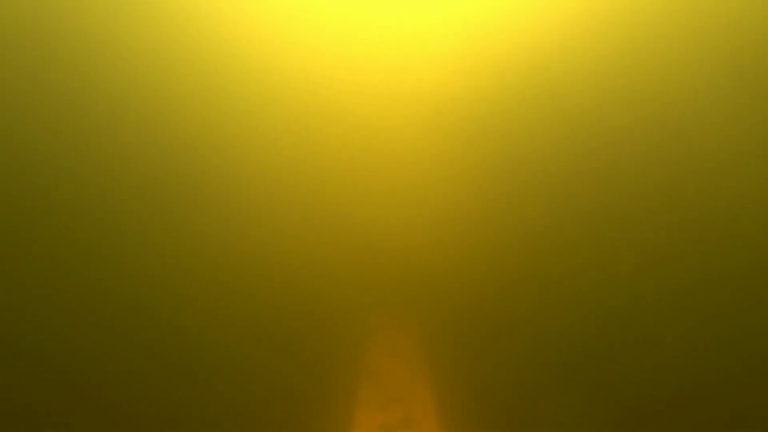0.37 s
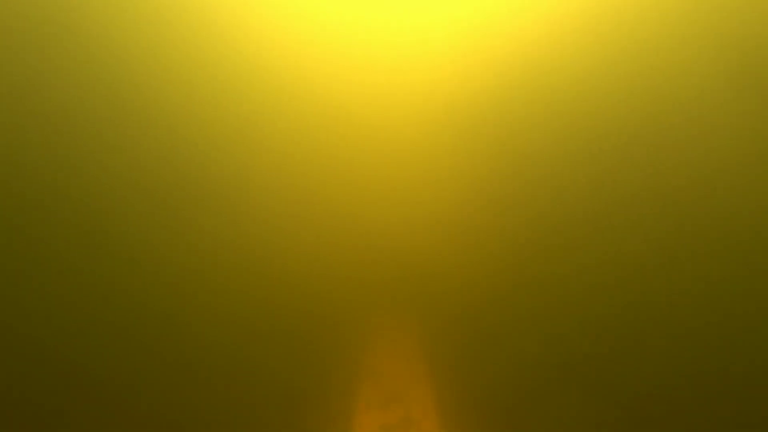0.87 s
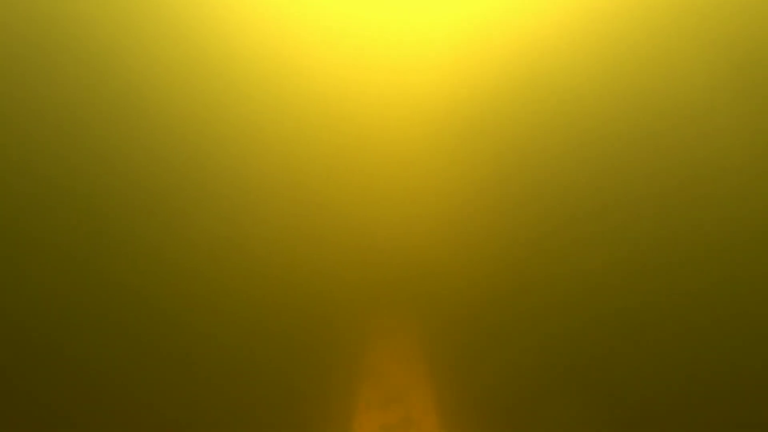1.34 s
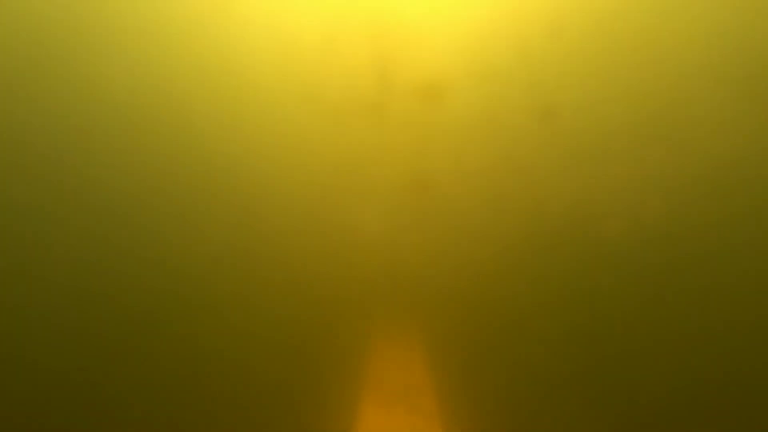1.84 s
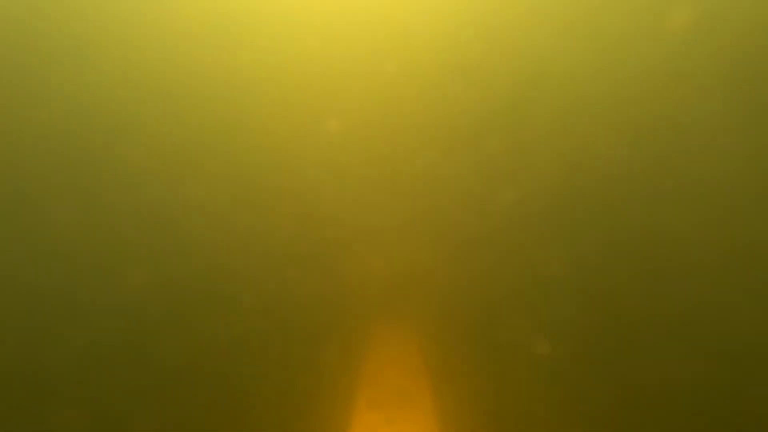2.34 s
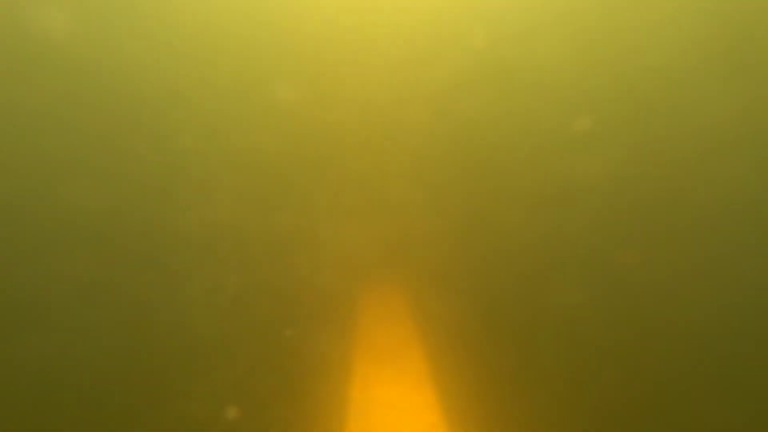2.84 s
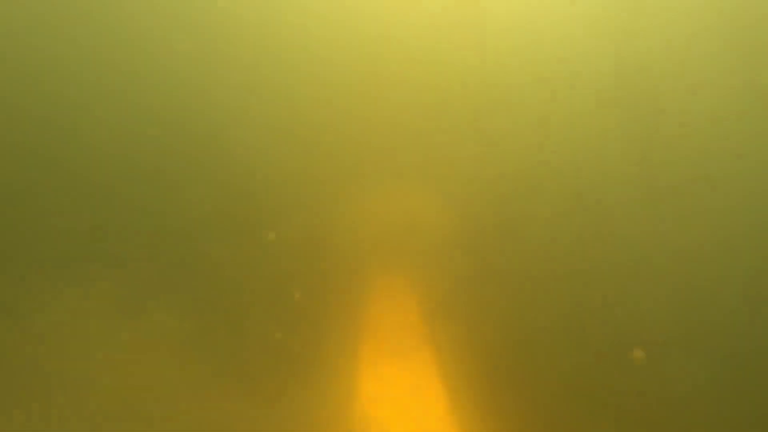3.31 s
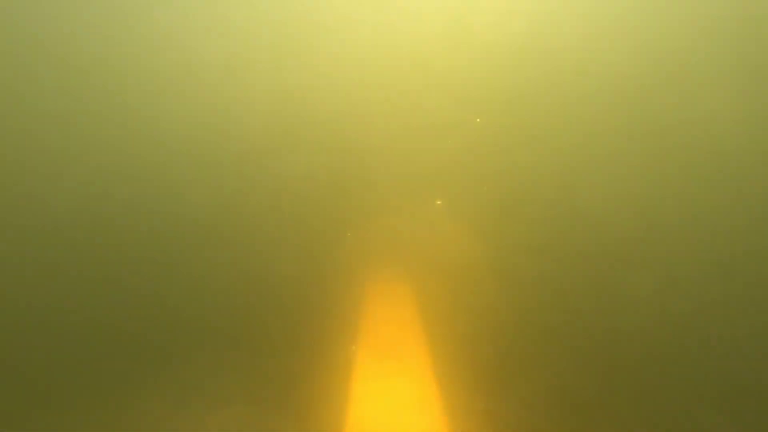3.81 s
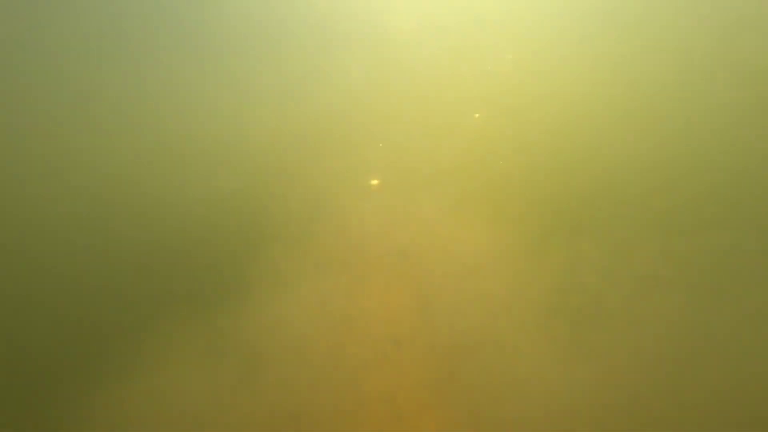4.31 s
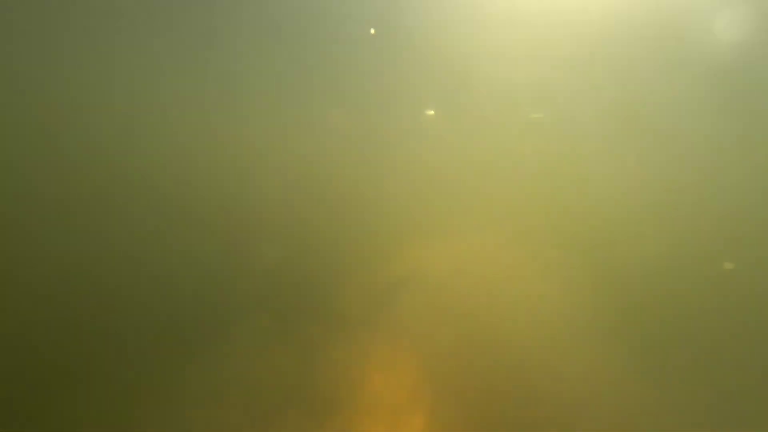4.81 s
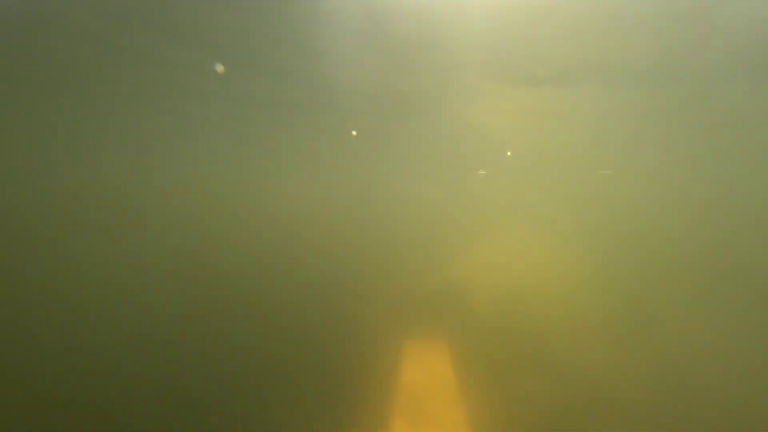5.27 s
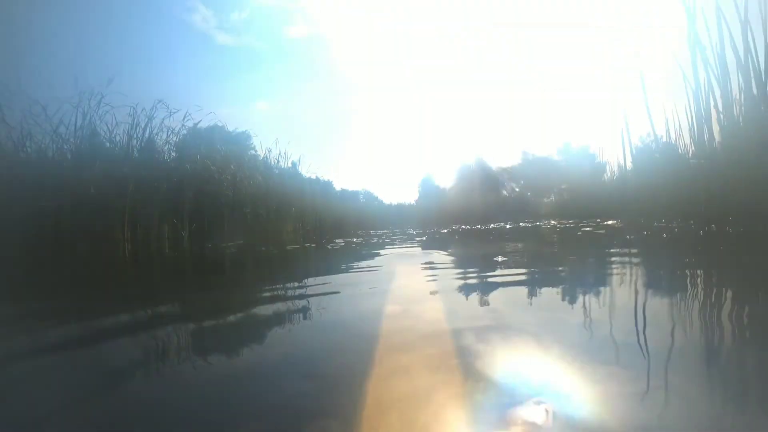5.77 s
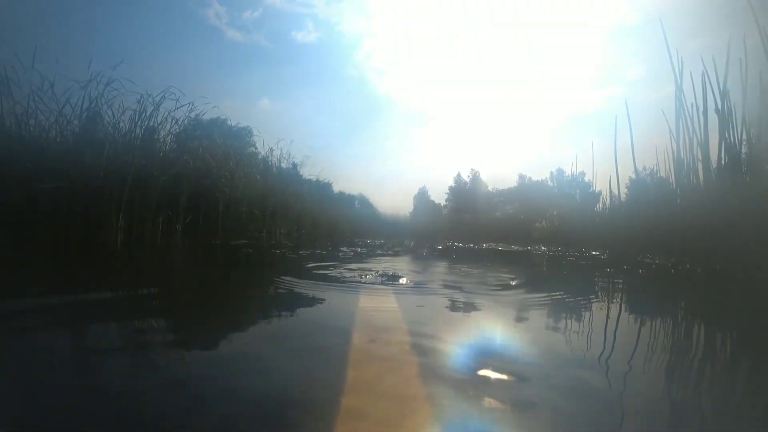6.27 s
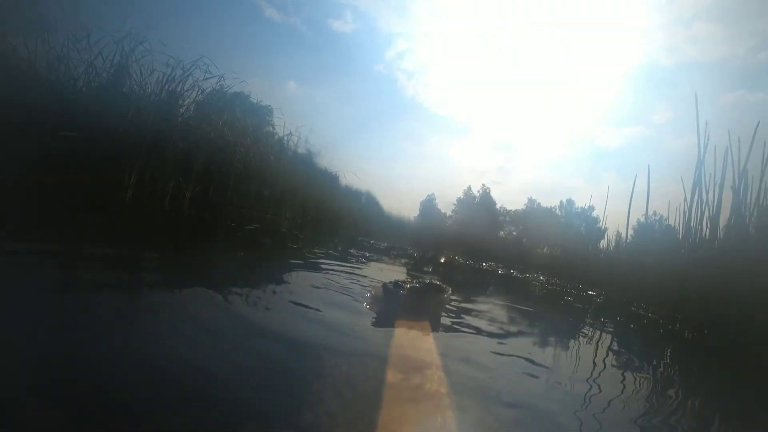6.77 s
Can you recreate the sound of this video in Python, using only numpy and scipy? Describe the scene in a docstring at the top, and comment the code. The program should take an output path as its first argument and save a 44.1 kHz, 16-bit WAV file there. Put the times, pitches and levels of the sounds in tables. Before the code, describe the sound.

Muffled near-silence under pond water, a run of bubbling tones, scrapes and low thuds, then loud clunks and rumbling slosh on surfacing.

```python
"""Housed camera drawn up through a pond

Heard from inside a sealed housing on a pole, which comes up through the water and breaks the surface.
Air escapes in a quickening string of bubble tones; jolts and noisy contacts ring pole and shell modes.
Slipping noise makes the drag and rubbing, low filtered noise the slosh of water against the housing.
The two capsules feel the shell's shaking mostly in opposite phase and slow pressure in phase."""
import sys
import numpy as np
from scipy import signal
from scipy.fft import rfft, irfft, next_fast_len
from scipy.io import wavfile
from scipy.ndimage import uniform_filter1d

SR = 44100
rng = np.random.default_rng(int(sys.argv[2]) if len(sys.argv) > 2 else 0)


def boost(x):
    """Linear amplitude factor 10**(x/20) for a level x in decibels (scalar or array-like)."""
    u = np.asarray(x, float) / 20
    return 10 ** u


def pcm_store(signal):
    """Save signal as 16-bit PCM."""
    levels = np.round(np.clip(np.atleast_2d(signal), -1, 1) * 32767)
    wavfile.write(sys.argv[1], SR, levels.astype(np.int16).T)


N = 314521
TIME = np.arange(N) / SR
SURFACE_S = 5.6  # the rig leaves the water

# Heavy jolts of the pole. Each row: start in seconds, shake level in dB, pressure level in dB,
# push length in seconds; levels are relative, ahead of the pole modes.
JOLTS = [(3.206, -52, -40, .0053), (3.253, -19, -17, .0039), (3.327, -35, -23, 0.0027),
         (3.344, -19, -35.5, 0.0047), (3.473, -34, -52, 0.0024), (4.138, -56, -41, 0.0042),
         (4.21, -44, -37, 0.004), (4.241, -33, -35, 0.0044), (5.073, -46, -55, 0.005),
         (5.244, -47, -41.5, 0.0031), (5.272, -46, -38, 0.0023), (5.31, -41, -39.5, 0.0026),
         (5.343, -45, -42.5, 0.0038), (5.662, -23, -19.5, 0.0038), (5.683, -27, -21.5, 0.0023),
         (5.694, -17, -22.5, .0042), (5.77, -21.5, -38, 0.0046), (5.879, -28, -22, .0025),
         (5.903, -27, -28, 0.0036), (6.084, -49, -46.5, 0.0033), (6.426, -27, -29, 0.008),
         (6.455, -22, -32, 0.0063), (6.514, -17.5, -38, .004), (6.528, -21, -34, 0.0072),
         (6.581, -25, -51, .0049), (6.603, -16, -34, 0.0042), (6.625, -16.5, -30, 0.0049),
         (6.888, -40, -59, 0.0021), (6.958, -18.5, -27.5, 0.0087), (7.112, -26, -43, 0.0037)]
# Pole modes, lighter out of the water. Each row: nominal pitch in Hz, free decay t60 in seconds,
# shake in dB under water, shake in dB in air, pressure in dB under water, pressure in dB in air.
POLE_MODES = [(46, 0.29, -26, -22, -6, -3), (87.16, 0.32, -16, -13, 1.5, 1),
              (120.5, 0.13, 0.5, -7, 4.5, 1.5), (147.5, 0.11, -3, -2, -9.5, -7),
              (175, 0.078, -5, -17, -7, -25), (247, 0.13, -3, -2.5, -17, -19),
              (254, 0.49, -7.5, -9, -15.5, -21.5), (302, 0.024, -0.5, -17, -39, -51)]


def colour(x, points, turn=1):
    """Filter by (Hz, dB) points; turn rotates the phase."""
    hz, db = np.transpose(points)
    size = next_fast_len(N)
    f = np.maximum(np.arange(size // 2 + 1) * SR / size, 1)
    gain = boost(np.interp(np.log(f), np.log(hz), db))
    return irfft(rfft(x, size) * turn * gain, size)[..., :N]


def unit(x):
    """Scale to rms 1."""
    return x / np.sqrt(np.mean(x ** 2))


def ring(x, hz, t60):
    """One decaying mode; a unit impulse starts it at amplitude 1."""
    pole = np.exp(2j * np.pi * hz / SR - np.log(1000) / (t60 * SR))
    return signal.lfilter([0, pole.imag], [1, -2 * pole.real, abs(pole) ** 2], x)


def shell(x):
    """The housing rings with all its modes, neighbours in opposite sign."""
    # Each row: mode pitch in Hz, decay t60 in seconds, level in dB.
    shell_modes = [(400, 0.01, -1.5), (560, 0.032, -3), (677, 0.026, -4.5), (861, 0.013, -4.5),
                   (1130, 0.0094, -9), (1374, 0.021, -14.5), (1500, 0.0098, -14), (1905, 0.0037, -13.5),
                   (2190, 0.016, -26.5), (2700, 0.0022, -33.5)]
    return sum((-1) ** k * boost(db) * ring(x, hz, t60) for k, (hz, t60, db) in enumerate(shell_modes))


def walk(rate):
    """Slow random wander with a spread near 1, drawn afresh rate times a second."""
    k = int(SR / rate)
    steps = np.repeat(rng.standard_normal(N // k + 1), k)
    return unit(uniform_filter1d(steps, k)[:N])


def grit(per_s, spread_db):
    """Two rows of random slips that share their moments and part of their size."""
    size = (rng.random(N) < per_s / SR) * boost(spread_db * rng.exponential(size=N))
    return unit(size * rng.standard_normal((2, N)))


def add(out, s, x):
    """Mix x into out from time s."""
    i = int(s * SR)
    out[..., i:i + x.shape[-1]] += x[..., :N - i]


def swell(law, s, db, rise, fall):
    """Gain of a layer: a steady part that follows the motion, plus peaks, summed in power."""
    # How hard the rig moves through the water. Each row: time in seconds, motion in dB.
    motion = [(0, -32.5), (0.55, -11.5), (0.93, -4.5), (1.2, -6.5), (1.6, 0.5), (2.0, -1.5), (2.7, 3.5),
              (3.05, 10.5), (3.5, 8), (3.7, 1.5), (4.0, -4), (4.2, 8), (4.44, -7.5), (4.7, 7), (4.95, -6),
              (5.3, 17), (5.46, 1.5), (5.65, 17), (6.0, 10), (6.24, 1.5), (6.5, 27), (6.85, 13), (7.13, 15)]
    at_rest_db, follow = law  # dB at 0 dB of motion, share of the motion followed
    t = TIME[::64, None]
    steady_db = at_rest_db + follow * np.interp(t[:, 0], *np.transpose(motion))
    peaks = boost(db) * np.exp(np.where(t < s, (t - s) / rise, (s - t) / fall))
    gain = np.sqrt(boost(steady_db) ** 2 + (peaks ** 2).sum(axis=1))
    return np.interp(TIME, t[:, 0], gain)


def bubbles():
    """Tones struck as each bubble pinches off, starting 1 % flat and settling; (shared, opposed)."""
    # Escaping air. Each row: time in seconds, short pop in Hz, pop level in dB, longer ring in Hz,
    # ring level in dB.
    escapes = [(1.831, 963, -31, 627, -27.5), (1.953, 1312, -8, 820, -8), (2.121, 1156, -13.5, 1300, -35.5),
               (2.193, 1046, -18.5, 1430, -29), (2.349, 1000, -18.5, 1265, -22.5),
               (2.405, 980, -20, 1190, -23), (2.454, 940, -21.5, 1127, -23), (2.501, 930, -23.5, 1300, -25),
               (2.547, 865, -30, 1294, -22), (2.59, 910, -31, 1290, -24), (2.622, 834, -35, 1240, -26.5),
               (2.653, 900, -30, 1254, -25.5), (2.686, 1220, -25.5, 1230, -30),
               (2.717, 1550, -21.5, 1200, -26), (2.748, 1550, -22, 1160, -23), (2.78, 1440, -16, 1130, -24),
               (2.811, 1140, -15.5, 1470, -26), (2.838, 1120, -17.5, 1380, -24),
               (2.867, 1130, -19, 1400, -25), (2.924, 1350, -37, 637, -34), (2.956, 1644, -15.5, 1230, -36),
               (2.985, 1500, -15, 1130, -33), (3.019, 1385, -14.5, 1210, -29),
               (3.052, 1370, -17, 1160, -26), (3.084, 1410, -26, 1250, -26.5), (3.119, 1363, -19, 907, -24),
               (3.158, 1345, -18, 1470, -42), (3.195, 1470, -18, 1324, -23), (3.225, 1340, -35, 1550, -26),
               (3.349, 1330, -27, 1000, -45), (3.478, 1113, -30, 880, -33.5),
               (3.62, 1353, -27.5, 1150, -41), (6.962, 676, -32, 532, -27), (6.985, 760, -42, 567, -29.5),
               (7.02, 653, -38, 554, -32.5)]
    # In-phase part of a bubble tone, set by how the shell carries that pitch.
    # Each row: pitch in Hz, level in dB.
    carried = [(600, -11.5), (850, -11.5), (1000, -12), (1150, -18.5), (1270, -10), (1350, -17),
               (1430, -24.5), (1520, -20), (1630, -15), (1800, -8)]
    # Housing-wall tones that every bubble leaves ringing. Each row: nominal pitch in Hz, nominal level
    # in dB over the mean of pop and ring, decay t60 in seconds, in-phase part in dB.
    wall_tones = [(874, -8.5, 0.049, -13), (1056, -11, 0.055, -19), (1470, -9, 0.058, -25),
                  (1718, -17.5, 0.047, -11.5)]
    # Tick of a bubble breaking free. Each row: frequency in Hz, level in dB.
    tick_colour = [(250, -13.5), (600, 6), (1200, 0.5), (2200, -17.5), (3600, -30.5), (6000, -43)]
    out, tick, t = np.zeros((2, N)), np.zeros(N), TIME[:SR // 8]
    bend = t - 0.00027 * (1 - np.exp(-t / 0.025))
    for s, pop_hz, pop_db, ring_hz, ring_db in escapes:
        # near 1 for low-ringing bubbles, which press more in phase and pop longer
        big = 1 / (1 + (ring_hz / 827 / 1.06) ** 12)
        pop_shared, ring_shared = np.interp([pop_hz, ring_hz], *np.transpose(carried)) + 4.5 * big
        pop_t60 = 0.024 * (1 + 0.74 * big)
        tones = [(pop_hz, pop_db, pop_t60, pop_shared), (ring_hz, ring_db, 0.05, ring_shared)]
        for hz, db, t60, shared_db in wall_tones:
            a, b = rng.standard_normal(2)
            wall_db = (pop_db + ring_db) / 2 + db + 3.5 * b
            tones.append((hz * (1 + 0.035 * a), wall_db, t60, shared_db))
        for hz, db, t60, shared_db in tones:
            onset = 1 - np.exp(-(t * hz / 1.57) ** 2)  # big bubbles start rounder
            envelope = onset * np.exp(-np.log(1000) * t / t60)
            phase = 2 * np.pi * hz * bend
            pair = np.array([-boost(shared_db) * np.cos(phase), np.sin(phase)])
            add(out, s - .001, boost(db) * envelope * pair)
            # the tick grows less than the ring
            add(tick, s - .0006, boost(np.array([0.53 * (db + shared_db)])))
    return out + boost(np.array([[-6.], [-3.]])) * colour(tick, tick_colour)


def thumps():
    """A soft push sets the pole swinging, shared out differently each time; (shared, opposed)."""
    out, t = np.zeros((2, N)), TIME[:SR // 2]
    for s, shake_db, pressure_db, length in JOLTS:
        push = np.gradient(-np.exp(-((t - length) / length / 0.35) ** 2))  # out and back
        push = push / np.abs(np.sum(push * np.exp(2j * np.pi * 120 * t)))  # equal strength at 120 Hz
        for hz, t60, shake_wet, shake_air, press_wet, press_air in POLE_MODES:
            wet = s < SURFACE_S
            a, b, d = rng.standard_normal(3)
            press = pressure_db + (press_wet if wet else press_air) + 0.5 * a
            shake = shake_db + (shake_wet if wet else shake_air) + 2.2 * b
            gains = boost(np.array([press, shake]))
            add(out, s, gains[:, None] * ring(push, hz * (1 + 0.012 * d), t60))
    return boost(-2.5) * out


def knocks():
    """A short rattling contact drives the shell modes; its treble comes through as a crack."""
    # Hard contacts on pole and shell. Each row: peak in seconds, drive of the shell in dB,
    # crack in dB ahead of its filter and gain, contact scale in seconds.
    contacts = [(1.374, -60, -49.5, 0.00065), (1.64, -41, -75, 0.0046), (1.706, -29, -50, .0012),
                (1.757, -40, -75, .006), (2.18, -37.5, -73, .01), (2.81, -51, -58.5, .004),
                (3.063, -53, -44.5, 0.0011), (3.09, -31.5, -64, 0.013), (3.215, -30.5, -52.5, 0.011),
                (3.229, -41, -43, 0.0013), (3.258, -36, -54.5, 0.0076), (3.282, -55, -45, .0012),
                (3.325, -24, -43.5, 0.002), (3.335, -25.5, -49, .011), (3.383, -31.5, -64, .003),
                (3.569, -34, -78, 0.016), (3.595, -37.5, -84, 0.0042), (4.082, -37, -54, 0.0053),
                (4.137, -34, -65.5, .003), (4.147, -37, -32, 0.00066), (4.212, -26, -49.5, 0.012),
                (4.238, -26, -57, 0.0025), (4.553, -38, -81, 0.023), (4.686, -55, -56, 0.00075),
                (4.725, -40, -44.5, .0011), (4.792, -45, -48.5, 0.0015), (4.807, -42, -56, 0.0058),
                (4.821, -46, -50.5, .0008), (4.954, -51, -56.5, .002), (5.012, -38, -72, .003),
                (5.077, -41.5, -76, .006), (5.237, -25.5, -61, 0.0029), (5.255, -35, -63, 0.0031),
                (5.275, -26.5, -58, 0.0019), (5.311, -23.5, -48.5, 0.00069), (5.337, -37, -65, .0045),
                (5.356, -32, -70, .0015), (5.625, -42, -67.5, .006), (5.663, -21, -55.5, 0.0062),
                (5.671, -29.5, -33, 0.0022), (5.685, -10, -36.5, 0.0017), (5.697, -19.5, -35.5, 0.0016),
                (5.778, -25, -51.5, .0015), (5.858, -24.5, -51, .0022), (5.884, -13, -35, 0.0032),
                (5.889, -16, -31, 0.00073), (5.91, -17, -39.5, 0.0029), (6.124, -41, -61, .009),
                (6.14, -36, -64, 0.01), (6.164, -45, -60, .0015), (6.277, -37.5, -65.5, .012),
                (6.392, -40, -55.5, 0.01), (6.415, -25, -53, 0.019), (6.438, -21.5, -50, 0.0052),
                (6.447, -36.5, -58.5, 0.039), (6.526, -38, -66, 0.0067), (6.548, -33, -62, .0027),
                (6.593, -35, -62.5, .0018), (6.61, -37, -68.5, 0.011), (6.628, -29, -71, 0.0037),
                (6.652, -33, -62, .0025), (6.751, -72, -43.5, 0.0016), (6.765, -43, -62, .0022),
                (6.958, -43.5, -64, .0014), (6.967, -46, -70, .004), (6.976, -33, -66, .007),
                (6.987, -45, -50.5, 0.0019), (7.009, -43.5, -61.5, 0.0041), (7.123, -30, -68, .004)]
    # Each row: frequency in Hz, level in dB.
    crack_colour = [(1500, -10), (2400, -8), (3300, -13), (4400, -16.5), (5300, -16.5), (6100, -18.5),
                    (6900, -22), (8000, -33.5), (11000, -36.5), (16000, -50)]
    body, crack, t = np.zeros((2, N)), np.zeros((2, N)), TIME[:SR // 25] - .02
    for s, body_db, crack_db, length in contacts:
        noise = rng.standard_normal((2, len(t)))
        # rises over 0.72 and falls over 1.36 of the contact scale
        contact = np.exp(np.where(t < 0, t / 0.72, -t / 1.36) / length)
        push = contact * (noise + 0.87 * uniform_filter1d(noise, size=12))  # treble plus a softer shove
        push = push / np.sqrt((push ** 2).sum(axis=1, keepdims=True))
        add(body, s - .021, boost(body_db) * push)
        add(crack, s - .02, boost(crack_db) * contact * noise)
    return shell(body) + boost(21) * colour(crack, crack_colour)


def stroke_gain(law, column):
    """Steady drag plus the strokes of hands and water along the rig, for one level column."""
    # Each row: peak in seconds, fade in seconds, rumble in dB, rub in dB, scratch in dB;
    # levels are nominal, ahead of the uneven slips.
    strokes = [(0.93, 0.053, -67, -52.5, -72), (1.412, 0.044, -59, -50, -63),
               (1.619, 0.026, -58, -46.5, -69), (1.74, 0.021, -65, -47, -70), (1.83, .02, -70, -57, -79),
               (1.957, 0.0081, -54, -43, -66), (2.19, 0.054, -57, -50, -78), (2.45, 0.44, -58, -47.5, -83),
               (2.85, 0.048, -56, -37.5, -65.5), (2.925, 0.04, -44.5, -52, -72),
               (3.092, 0.062, -46, -34, -53), (3.208, 0.032, -53, -31, -54),
               (3.332, 0.028, -28, -33, -50.5), (3.48, 0.032, -52, -42.5, -86),
               (4.14, 0.068, -53, -42.5, -67), (4.231, 0.013, -28, -31, -72),
               (4.545, 0.031, -43.5, -52.5, -73), (4.74, 0.093, -70, -49.5, -64.5),
               (5.045, 0.037, -54.5, -58, -84), (5.3, 0.031, -45, -47.5, -66), (5.61, 0.027, -59, -51, -77),
               (5.674, 0.017, -27, -22.5, -47), (5.79, 0.0086, -38, -46.5, -69),
               (5.905, 0.018, -19.5, -33.5, -51), (6.14, 0.075, -62, -52.5, -65.5),
               (6.275, 0.025, -41.5, -58, -74), (6.422, 0.043, -36, -34, -58),
               (6.35, 0.044, -57, -57, -58.5), (6.5, .05, -37, -50, -59.5), (6.55, 0.026, -38, -47, -63),
               (6.631, 0.045, -29, -47, -66), (6.84, 0.033, -51, -54.5, -70),
               (6.97, 0.03, -36.5, -41.5, -64), (7.11, 0.024, -38.5, -50, -78)]
    columns = np.transpose(strokes)
    s, fade = columns[:2]
    return swell(law, s, columns[column], 0.7 * fade, fade)


def pole_rumble():
    """Water flow keeps the pole modes rumbling, with a shudder after every jolt."""
    # Colour of the flow. Each row: frequency in Hz, level in dB.
    flow_colour = [(20, -8), (60, 14), (120, 3.5), (170, 2.5), (250, 7), (330, 10.5), (500, -68.5)]
    flow = colour(rng.standard_normal((2, N)), flow_colour)
    pole = np.zeros((2, N))
    for k, (hz, t60, wet_db, air_db, *_) in enumerate(POLE_MODES):
        mode_db = np.where(TIME < SURFACE_S, wet_db, air_db) - np.log2(hz / 120)  # tilts -1 dB per octave
        pole += (-1) ** k * boost(mode_db) * unit(ring(flow, hz, 0.74 * t60))
    jolt_s, _, pressure_db, push_s = np.transpose(JOLTS)
    # 6 dB under the jolt's pressure, rising over 6 ms and falling over 29 ms, with no steady part
    shudder = swell((-np.inf, 0), jolt_s + push_s, pressure_db - 6, 0.006, 0.029)
    gain = np.hypot(stroke_gain((-66.5, 0.99), 2), shudder)
    return unit(unit(pole) + 0.19 * unit(flow)) * gain * boost(1.2 * walk(12))


def shell_rub(slip):
    """Gritty slips ring the shell modes, coloured one way under water and another in air."""
    # Rubbing as it leaves the shell, under water. Each row: frequency in Hz, level in dB.
    wet_colour = [(300, -0.5), (900, -2.5), (1500, 3.5), (3500, 13), (5000, -24)]
    # The same in air. Each row: frequency in Hz, level in dB.
    air_colour = [(300, 2.5), (900, -2), (1500, 4.5), (3000, -6), (5000, -24)]
    rubbed = shell(grit(700, 1.64))
    wet, air = unit(colour(rubbed, wet_colour)), unit(colour(rubbed, air_colour))
    rub = np.where(TIME < SURFACE_S, wet, air)
    return rub * stroke_gain((-59.5, 0.48), 3) * boost(2.35 * np.tanh(slip))


def fine_scratch(slip):
    """Dense tiny slips, filtered to a fine scratch that flickers with the rubbing and by itself."""
    # Each row: frequency in Hz, level in dB.
    scratch_colour = [(1500, -3.5), (2500, 1), (3400, -1), (4300, -9), (5200, -2), (6100, -6), (6800, -15),
                      (7800, -21.5), (16000, -59)]
    scratch = unit(colour(grit(6000, 1.8), scratch_colour))
    flicker_db = np.tanh(slip) + 0.97 * np.tanh(walk(67))
    return scratch * stroke_gain((-74.5, 0.11), 4) * boost(flicker_db)


def drag():
    """Rumble in the pole modes, gritty rubbing in the shell and a fine scratch, all uneven."""
    slip = walk(45)  # shared by rub and scratch
    return pole_rumble() + shell_rub(slip) + fine_scratch(slip)


def slosh():
    """Water heaving round the housing presses on both capsules alike."""
    # Heaves against the housing. Each row: peak in seconds, fade in seconds, deep band in dB,
    # upper band in dB.
    heaves = [(0.79, .06, -67, -66), (0.94, .04, -54, -55), (1.17, .04, -53, -58), (1.29, .1, -48, -60),
              (1.58, .09, -42.5, -64.5), (1.76, .07, -44.5, -67), (2.0, .035, -36.5, -49),
              (2.14, .04, -41, -54.5), (2.38, .06, -60, -48), (2.88, .07, -34.5, -50.5),
              (3.06, .05, -52, -55.5), (3.28, .08, -30, -32), (3.33, .04, -33, -34),
              (3.53, .06, -48, -48.5), (3.95, .05, -49.5, -55.5), (4.09, .05, -40.5, -70),
              (4.21, .07, -38.5, -44), (4.452, .03, -40, -67), (4.65, .07, -47.5, -50),
              (4.83, .1, -40.5, -49.5), (5.04, .08, -40.5, -63), (5.15, .05, -45, -51),
              (5.35, .06, -35, -43), (5.687, .04, -26, -34.5), (5.78, .03, -46, -42), (5.9, .03, -41, -36),
              (5.985, .035, -32, -62), (6.11, .03, -64, -51), (6.191, .035, -41, -67),
              (6.33, .04, -39.5, -42.5), (6.43, .08, -26.5, -56), (6.559, .07, -33, -66),
              (6.65, .07, -28, -53), (6.93, .04, -38, -51.5), (6.985, .05, -26, -59),
              (7.08, .04, -25.5, -58)]
    s, fade, deep_db, upper_db = np.transpose(heaves)
    deep = colour(rng.standard_normal(N),
                  [(5, -3.5), (18, 3.5), (35, 0.5), (50, -5.5), (75, -65.0), (200, -74)])
    upper = colour(rng.standard_normal(N),
                   [(40, -11.0), (65, -1.5), (86, 6.5), (120, -6.0), (200, -12.5), (400, -59.5)])
    deep_gain = swell((-54, 0.79), s, deep_db, 0.68 * fade, fade)
    upper_gain = swell((-64, 0.81), s, upper_db, 0.68 * fade, fade)
    return unit(deep) * deep_gain + unit(upper) * upper_gain


def still_noise():
    """Faint filtered noise that goes on throughout, its level wandering a little round -59 dB."""
    # Each row: frequency in Hz, level in dB.
    still_colour = [(20, -51), (200, -10), (560, -22), (750, -11), (1000, -8), (1330, 4), (1700, -7),
                    (2250, -12), (2900, -32), (4000, -29), (5900, -30), (7000, -33)]
    noise = unit(colour(rng.standard_normal((2, N)), still_colour))
    return boost(-59 + 1.27 * walk(12)) * noise


def preamp_hiss():
    """Preamplifier hiss at -68.5 dB rms, partly common to both channels."""
    # Each row: frequency in Hz, level in dB.
    hiss_colour = [(100, 26.5), (1000, 12.5), (5000, 2.5), (9000, -5), (13000, 0.5), (16000, -34)]
    left, right, common = rng.standard_normal((3, N))
    hiss = np.array([left, right]) + 1.04 * common
    return boost(-68.5) * unit(colour(hiss, hiss_colour))


def scene():
    """Opposed shaking and shared pressure, summed at the left and right capsule."""
    # In-phase part of the shell's shaking, relative to the opposed part.
    # Each row: frequency in Hz, level in dB.
    in_phase = [(60, 0.5), (150, -9.5), (350, -12.5), (520, -10.5), (690, -13.5), (900, -2.5), (1200, -9),
                (1600, -8.5), (2200, -5.5), (4000, -7), (5800, -3), (7500, 2.5), (10000, 0.5), (15000, 1)]
    air_shared, air_opposed = bubbles()
    jolt_shared, jolt_opposed = thumps()
    shake, other = knocks() + drag() + still_noise()
    water = slosh()
    tied = 0.43  # share of the in-phase power that follows the opposed part, a quarter cycle behind
    following = colour(np.sqrt(tied) * shake, in_phase, turn=-1j)
    independent = colour(np.sqrt(1 - tied) * other, in_phase)
    # the pole's swing reaches one capsule ahead of the other
    swing = colour(jolt_opposed, [(30, -16), (80, 1.5)], turn=np.exp(1.2j))
    water_opposed = colour(water, [(20, -25.5), (100, -30.5)], turn=1j)
    shared = following + independent + jolt_shared + air_shared + water
    opposed = shake + air_opposed + swing + water_opposed
    return np.array([shared + opposed, shared - opposed])


def top_cut(x):
    """Nothing passes above the cut-off."""
    return signal.sosfilt(signal.butter(12, 16050, fs=SR, output="sos"), x)


def record(dry):
    """The capsules' signal with the preamplifier hiss on top, as it is stored."""
    mix = dry + preamp_hiss()
    return top_cut(mix)


dry = scene()
out = record(dry)
pcm_store(out)
```